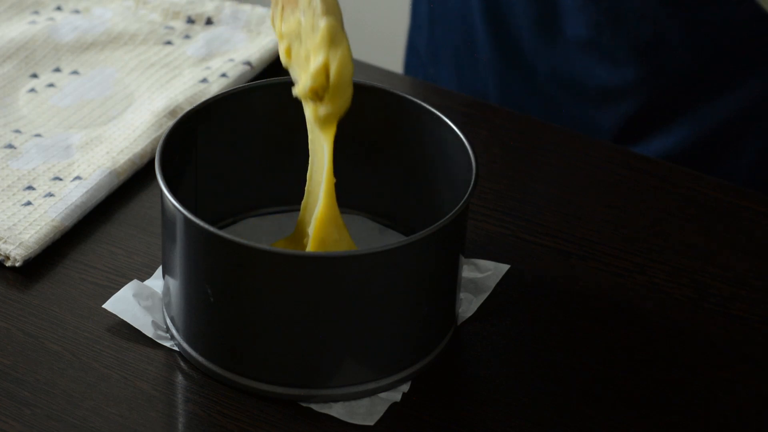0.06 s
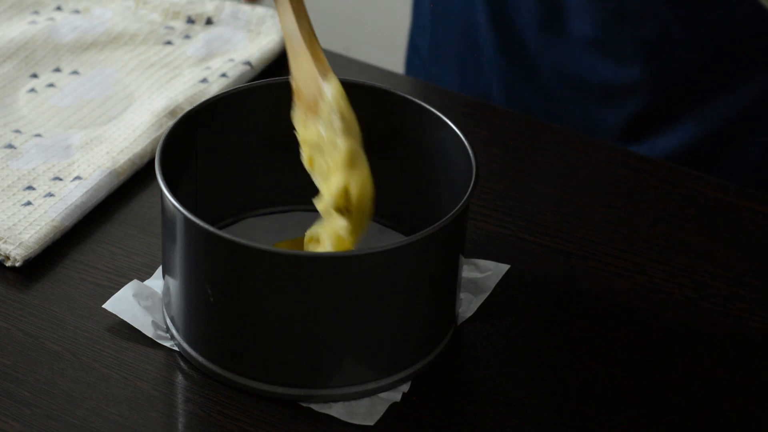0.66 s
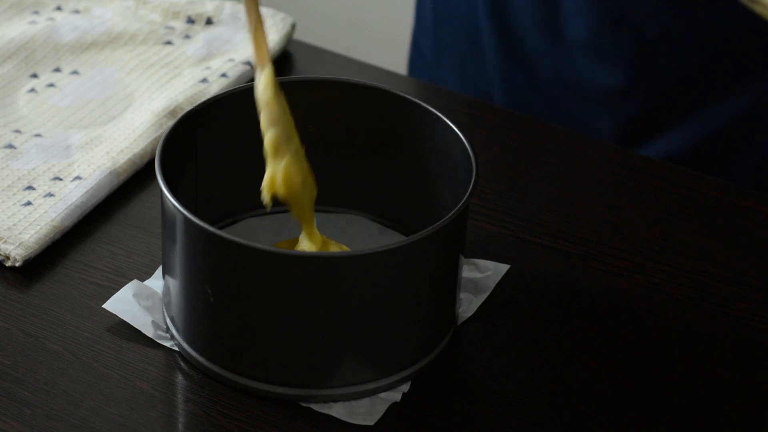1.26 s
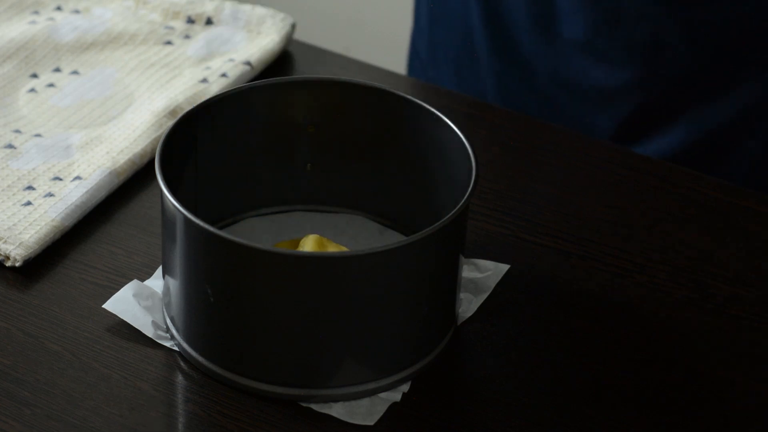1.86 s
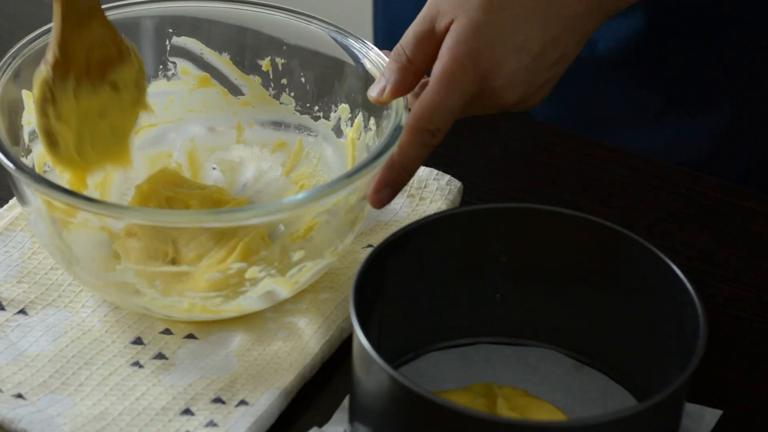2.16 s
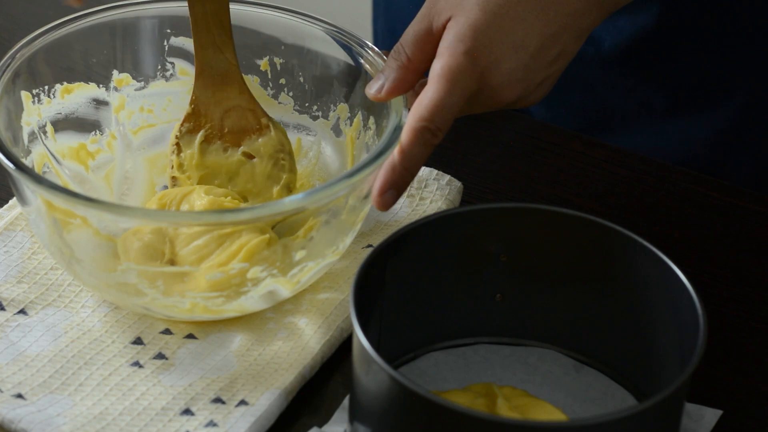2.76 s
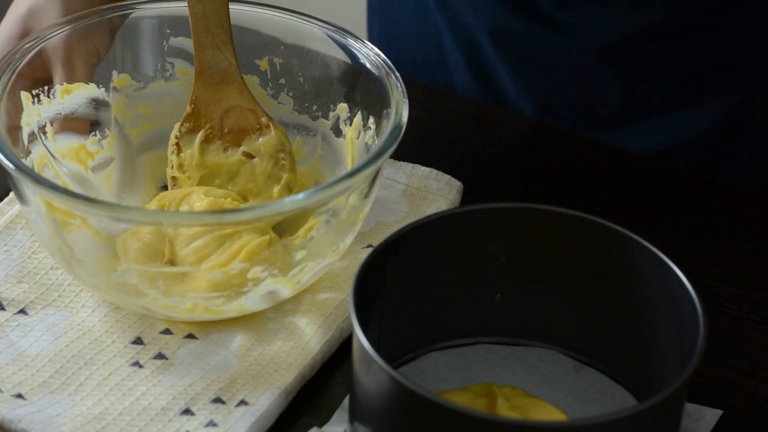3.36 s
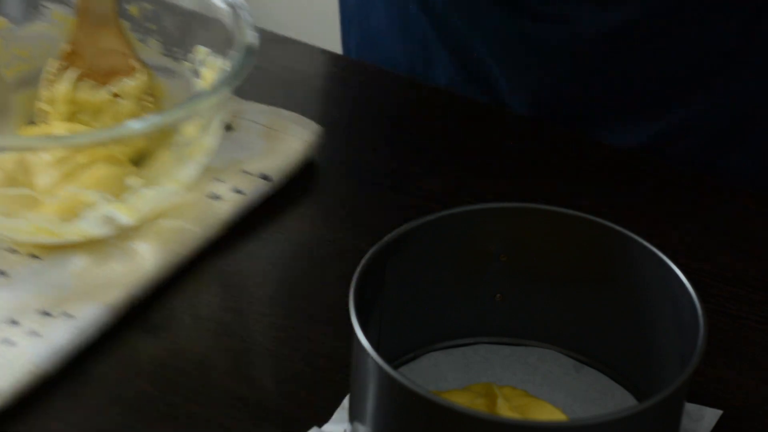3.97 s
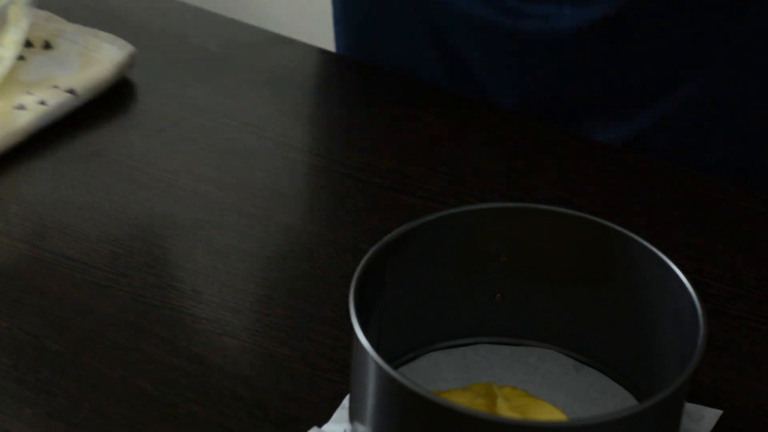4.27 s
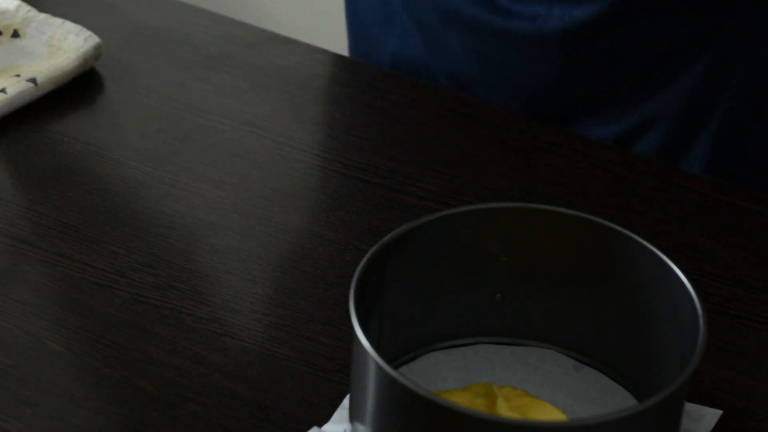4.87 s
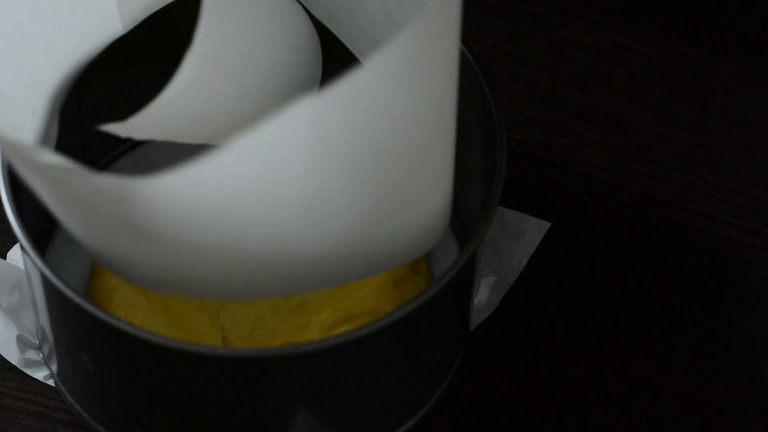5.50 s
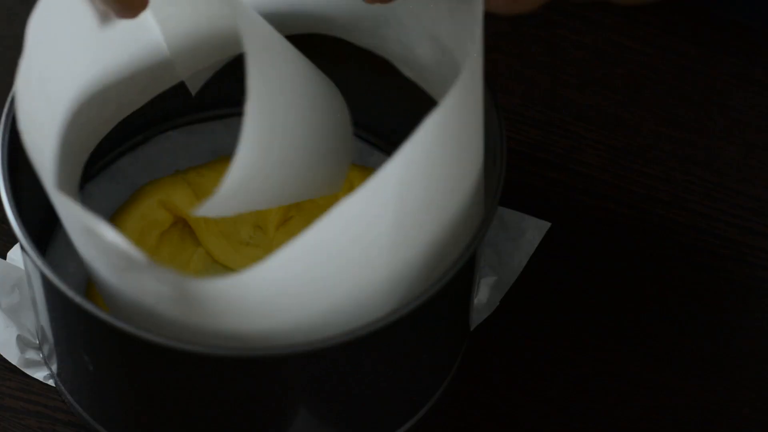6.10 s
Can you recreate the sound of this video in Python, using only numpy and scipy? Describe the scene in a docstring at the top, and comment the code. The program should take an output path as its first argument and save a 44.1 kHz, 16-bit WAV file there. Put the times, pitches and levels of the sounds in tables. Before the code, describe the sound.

In a small, slightly echoing kitchen, batter smears very faintly off a wooden spoon. The spoon clacks against a glass bowl, ticks, then clacks again with a quick rattle, the glass ringing briefly. The table takes a dull bump, the bowl slides away on a towel, and a lighter clink follows. Parchment paper then rustles, scrapes and snaps into a metal cake pan. Everything is heard from straight ahead over faint hiss.

```python
"""Baking at a kitchen table

Batter smears off a wooden spoon, the spoon clacks in a glass bowl and sets it ringing, the table is
bumped and the bowl is dragged away on its towel. Then a collar of parchment paper flexes, scrapes
and snaps as it is shoved into a metal cake pan. A small live room, with faint hum and hiss."""
import sys
import numpy as np
from scipy import signal
from scipy.fft import rfft, irfft, next_fast_len
from scipy.io import wavfile
from scipy.ndimage import map_coordinates

SR = 44100
rng = np.random.default_rng(int(sys.argv[2]) if len(sys.argv) > 2 else 0)


def file_out(sig):
    """Save sig as 16-bit WAV at sys.argv[1]."""
    # one column per channel
    cols = np.atleast_2d(sig).T
    # limit, then scale
    lim = np.clip(cols, -1, 1)
    pcm = np.round(lim * 32767).astype(np.int16)
    wavfile.write(sys.argv[1], SR, pcm)


N = 275184
TIME = np.arange(N) / SR
AGE = TIME[:SR * 3 // 4]  # seconds since a hit

# bending modes of the bowl's rim: f/Hz, relative level/dB, base t60/s
RIM_MODES = [(403, -7, .33), (1051, -5, .25), (1937, 2.5, .24), (3048, -2.5, .27), (4368, -8.5, .25),
             (5868, -25, .3), (7400, -25, .14)]
# tone of a paper crease giving way: f/Hz, level/dB
CREASE_SPECTRUM = [(41, -58), (70, -42), (272, -25), (613, -5), (822, -22.5), (1550, -8.5), (1770, -7),
                   (2030, -2.5), (2380, -8), (4090, -8), (4790, -13), (6570, -14.5), (15500, -19)]
# shoves of the paper into the pan: t/s, length/s, starting level/dB
PAPER_SHOVES = [(5.193, 0.21, -56.5), (5.444, 0.053, -52.5), (5.53, 0.02, -48), (5.748, 0.032, -58.5),
                (5.863, 0.084, -58.5), (6.049, 0.061, -53.5), (6.148, 0.041, -59), (6.206, 0.013, -42)]
# stereo image of the room: f/Hz, left-right likeness
ROOM_LIKENESS = [(100, 1), (1200, 0.99), (2500, 0.95), (5000, 0.8), (9000, 0.83), (15000, 0.56)]


def amp(db):
    """Decibels to gain."""
    return 10 ** (np.asarray(db) / 20)


def unit(x):
    """Scale to rms 1."""
    return x / np.sqrt(np.mean(x ** 2) + 1e-20)


def along(points, hz):
    """Read (frequency, value) points on a log axis."""
    f, v = np.transpose(points)
    return np.interp(np.log(hz + 1), np.log(f + 1), v)


def wobble(rate):
    """A smooth random curve, rate knots a second."""
    return map_coordinates(rng.standard_normal(int(N * rate / SR) + 4), [TIME * rate])


def swell(start_s, length_s, attack_s, fade_db_per_s, grow_db_per_s=0):
    """An envelope that rises, holds or grows until its length is up, then fades."""
    age = TIME - start_s
    db = grow_db_per_s * np.clip(age, 0, length_s) - fade_db_per_s * np.maximum(age - length_s, 0)
    return np.clip(age / attack_s, 0, 1) * amp(db)


def add(track, s, sound):
    """Mix a sound in at time s."""
    part = track[:, round(s * SR):][:, :sound.shape[-1]]
    part += sound[..., :part.shape[1]]


def filtered(x, response):
    """Equalise x with a gain given as a function of frequency."""
    n = x.shape[-1]
    padded = next_fast_len(n + 8192)
    return irfft(rfft(x, padded) * response(np.fft.rfftfreq(padded, 1 / SR)), padded)[..., :n]


def diffuse(n, likeness=ROOM_LIKENESS):
    """Stereo white noise, centred in the bass and wider in the treble."""
    def mid_side_gains(hz):
        width = np.arccos(np.clip(along(likeness, hz), 0, 1)) / 2
        return np.array([np.cos(width), np.sin(width)])
    mid, side = filtered(rng.standard_normal((2, n)), mid_side_gains)
    return np.array([mid + side, mid - side])


def rush(spectrum, likeness=ROOM_LIKENESS):
    """Steady stereo noise of rms 1 with the given colour."""
    return unit(filtered(diffuse(N, likeness), lambda hz: amp(along(spectrum, hz))))


def pulse(colour_db, spread=0.000409, size=4096):
    """A click with the energy of 10 ms at rms 1; bending waves carry its treble ahead of its bass."""
    hz = np.fft.rfftfreq(size, 1 / SR)
    cepstrum = irfft(np.log(amp(colour_db(hz)) + 1e-6))
    cepstrum[1:size // 2] *= 2  # minimum phase keeps the attack sharp
    cepstrum[size // 2 + 1:] = 0
    phase_lag = 4 * np.pi * spread * np.sqrt(1000 * hz)
    click = irfft(np.exp(rfft(cepstrum) - 1j * phase_lag))
    return unit(click) * np.sqrt(SR / 100 / size)


def ring(modes, rise_s, split, twin_db, twin_life):
    """Decaying modes, each beating against a weaker, slightly sharp twin."""
    hz, db, t60 = np.transpose(modes)[:, :, None]
    main = amp(-60 * AGE / t60) * np.sin(2 * np.pi * hz * AGE)
    twin = amp(twin_db - 60 * AGE / (t60 * twin_life)) * np.cos(2 * np.pi * hz * (1 + split) * AGE)
    gains = amp(db + rng.standard_normal(hz.shape))
    return (gains * (main + twin)).sum(0) * (1 - np.exp(-AGE / rise_s))


def in_kitchen(x, wet_db):
    """A short sound followed by its own dense tail of wall echoes."""
    # reverb time of the kitchen: f/Hz, t60/s
    reverb_times = [(150, 0.66), (500, 0.48), (1500, 0.29), (4000, 0.34), (12000, 0.31)]
    hz, t, noise = signal.stft(diffuse(len(AGE)), SR, nperseg=256)
    decay = amp(-60 * t / along(reverb_times, hz)[:, None])
    tail = signal.istft(noise * decay, SR, nperseg=256)[1][:, :len(AGE)]
    tail *= 1 - np.exp(-AGE / 0.00037)
    response = amp(wet_db) * tail / np.linalg.norm(tail[0])
    response[:, 0] += 1  # direct sound
    return signal.fftconvolve(x[None], response, axes=1)[:, :len(AGE)]


def hum():
    """A faint hum swells three times, wavering and sinking in pitch."""
    # swells of the hum: t/s, length/s, starting f/Hz, level/dB
    hum_swells = [(.9, 0.92, 542, -73), (3.25, 0.53, 560, -61.5), (4.77, 0.405, 557.5, -62)]
    sag_hz_per_s, waver_hz = 34, 8.93
    out = np.zeros(N)
    for s, length, hz, db in hum_swells:
        pitch_hz = hz - sag_hz_per_s * (TIME - s) + waver_hz * wobble(60)
        envelope = amp(db) * swell(s, length, attack_s=0.081, fade_db_per_s=150)
        out += envelope * np.sin(2 * np.pi * np.cumsum(pitch_hz) / SR)
    flutter = 1 + 0.3 * wobble(30)
    return flutter * out


def room_tone():
    """The bed: still air and microphone hiss, the hum, and a low drone that comes and goes once."""
    # tone of the air and hiss: f/Hz, level/dB
    air_spectrum = [(25, -46), (50, -26), (80, -16), (100, -12), (125, -0.5), (173, -7.5), (322, -3.5),
                    (520, -1), (700, -3), (1140, -3), (3300, -9.5), (15500, -15)]
    # their stereo image: f/Hz, left-right likeness
    air_likeness = [(60, 1), (150, 0.91), (380, 0.75), (950, 0.66), (2380, 0.025), (5980, 0.066),
                    (15000, 0.0)]
    drone_gain = amp(-76.5) * swell(start_s=0.92, length_s=0.72, attack_s=0.12, fade_db_per_s=110)
    drone_hz = 76 + 0.87 * wobble(9.1)
    drone = drone_gain * np.sin(2 * np.pi * np.cumsum(drone_hz) / SR)
    return amp(-57.5) * rush(air_spectrum, air_likeness) + hum() + drone


def batter():
    """One soft, sticky smear as the batter leaves the spoon."""
    smear_spectrum = [(200, -57), (600, 16), (2000, 19), (3500, -27), (12000, -26)]  # f/Hz, level/dB
    smear = swell(start_s=0.5, length_s=0.15, attack_s=0.11, fade_db_per_s=45)
    return smear * amp(-64 + 1.2 * wobble(40)) * rush(smear_spectrum)


def towel():
    """Cloth hisses over the wood grain in one pull: faster is louder, and its rasp rises in pitch."""
    # tone of the sliding cloth: f/Hz, level/dB
    cloth_spectrum = [(59, -52), (100, -25), (570, -11), (620, -17), (674, -5), (1090, -11), (1190, -18),
                      (1590, -3.5), (2370, -5.5), (15000, -27.5)]
    start_s, length_s, skew = 3.68, 0.81, 1.22
    progress = np.clip((TIME - start_s) / length_s, 0, 1)
    speed = 0.9 * np.sin(np.pi * progress ** skew)
    rasp_hz = 850 + 850 * speed
    roughness = unit(filtered(rng.standard_normal(N), lambda hz: 1 / (1 + (hz / 330) ** 2)))
    rasp = roughness * np.sin(2 * np.pi * np.cumsum(rasp_hz) / SR)
    hiss = amp(-53 + 0.45 * wobble(30.2)) * rush(cloth_spectrum)
    return speed * (hiss + amp(-49) * rasp)


def table_bump():
    """A dull, indirect knock with a short rattle; the table and pan hum on after it."""
    # the bump and its rattle: t/s, relative level/dB
    hits = [(3.2519, -40.5), (3.263, -40), (3.278, -42), (3.297, -42)]
    # tone of each hit: f/Hz, level/dB
    hit_spectrum = [(35, -73), (60, -37), (222, -5.5), (265, -6.5), (404, -9.5), (515, -9), (703, -5),
                    (768, -9), (1600, -6), (1780, -7.5), (12000, -37.5), (15600, -62), (22000, -120)]
    # ring of the table and pan: f/Hz, level/dB, t60/s
    table_modes = [(145, -47.5, 0.55), (227.5, -48, 0.41), (716, -38, 0.61)]
    out = np.zeros((2, N))
    for s, db in hits:
        knock = pulse(lambda hz: along(hit_spectrum, hz))
        add(out, s, amp(db - 10) * in_kitchen(knock, wet_db=12))
    add(out, hits[1][0], ring(table_modes, rise_s=0.055, split=0.0059, twin_db=-10, twin_life=1))
    return out


def shoving(fade_db_per_s):
    """The strongest shove at each moment: the paper catches, then the pressure builds."""
    shoves = [amp(db) * swell(s, length, attack_s=0.014, fade_db_per_s=fade_db_per_s, grow_db_per_s=38)
              for s, length, db in PAPER_SHOVES]
    return np.max(shoves, axis=0)


def crackle(per_s, spread_db, t60_s=0.0063):
    """Tiny creases give way at random, each a short burst of noise; rms 1 overall."""
    sizes = amp(spread_db * np.clip(rng.standard_normal(N), -2, 2))
    pops = (rng.random(N) < per_s / SR) * sizes
    power = signal.fftconvolve(pops ** 2, amp(-60 * AGE / t60_s) ** 2)[:N]
    return unit(np.sqrt(np.abs(power)) * rush(CREASE_SPECTRUM))


def parchment():
    """With each shove the sheet flexes and its edge slips along the pan; creases pop on top."""
    # body of the flexing sheet: f/Hz, level/dB
    sheet_spectrum = [(47, -56), (80, -32), (92, -33), (107, -2.5), (145, -29), (241, -12), (322, -7),
                      (445, -13.5), (584, 4), (712, -8), (1080, -2), (1520, -5), (1820, -7.5), (6000, -16),
                      (7800, -44), (13200, -120)]
    # bright scrape of its edge: f/Hz, level/dB
    edge_spectrum = [(1500, -22), (4000, -1), (9000, 2.5), (15500, -4.5)]
    # the loudest creases popping: t/s, relative level/dB, relative treble/dB
    snaps = [(5.1905, -36.5, -4), (5.2759, -36, -17), (5.3671, -30, -21), (5.485, -35, -15),
             (5.5518, -37, -10), (5.5759, -34, -44), (5.803, -39.5, -26), (5.899, -37, -14),
             (5.9848, -40, 2), (6.0897, -32.5, -25), (6.1698, -36.5, -40), (6.2169, -18, -15.5)]
    held = amp(-58) * (TIME > PAPER_SHOVES[0][0])  # the bent sheet keeps rustling between shoves
    flexing = np.hypot(held, amp(-2.5) * shoving(fade_db_per_s=110))
    sliding = amp(-2.5) * shoving(fade_db_per_s=194)  # the edge stops before the sheet settles
    slips = wobble(260)
    rustle = flexing * amp(1.9 * slips + 0.63 * wobble(45)) * rush(sheet_spectrum)
    scrape = sliding * amp(2.0 * slips + 1.6 * wobble(1500)) * rush(edge_spectrum)
    creases = (amp(-12.5) * flexing + amp(-10.5) * sliding) * crackle(per_s=220, spread_db=5)
    out = rustle + scrape + creases
    for s, db, treble_db in snaps:
        shelf_db = lambda hz: (treble_db + 13.5) / (1 + (5000 / (hz + 1)) ** 4)
        snap = pulse(lambda hz: along(CREASE_SPECTRUM, hz) + shelf_db(hz))
        add(out, s, amp(db - 17) * in_kitchen(snap, wet_db=4.5))
    return out


def rim_db(hz, lift_db, width=0.017):
    """The bowl radiates a clack most strongly around its own modes."""
    return sum(lift_db / (1 + ((hz / mode_hz - 1) / width) ** 2) for mode_hz, _, _ in RIM_MODES)


def spoon_knocks():
    """Each blow is a wooden clack plus the ring of the glass, which the pressed spoon damps quickly."""
    # spoon on bowl: t/s, clack level/dB, contact corner f/Hz, thud lift/dB, glass level/dB,
    # ring length factor (small while the spoon stays pressed), rim lift/dB
    knocks = [(2.1917, -23, 3200, -10.5, -20, 0.78, 8.5), (2.519, -48.5, 1100, 5.5, -60, 1, 7),
              (2.6975, -19.5, 4140, -3.5, -24, 1.17, 9.5), (2.727, -28, 4420, -7.5, -33, 1.34, 7),
              (2.7576, -48, 1810, 8, -28, 0.45, 2), (2.778, -63, 1790, -6.5, -18.5, 0.7, 6),
              (4.543, -34, 2210, -4.5, -30, 1, 13.5)]
    # tone of the wooden clack: f/Hz, level/dB
    wood_spectrum = [(60, -41), (200, -32), (390, -5), (730, -1.5), (880, -12), (1200, 3), (1450, 0),
                     (2030, -9.5), (2300, -3.5), (2700, -12), (3600, -12.5), (5200, -21), (7500, -21.5),
                     (12000, -24.5)]
    # short resonances of the spoon pressed on the bowl: f/Hz, relative level/dB, t60/s
    spoon_modes = [(372, -15, .35), (548, -11, .3), (614, -8, .3), (716, -5, .27), (765, -12, .25),
                   (1152, -6, .22), (1186, -1, .2), (1265, -4, .13), (1356, 0, .2), (1457, -5, .18),
                   (1490, -6, .18), (1525, -4, .2), (1659, -7, .17), (1763, -5, .12), (2183, -10, .2),
                   (2341, -8, .18), (4310, -6, .16)]
    out = np.zeros((2, N))
    for s, db, corner_hz, thud_db, glass_db, ring_factor, rim_lift_db in knocks:
        # a softer contact lasts longer and loses treble; a heavier one pushes the whole bowl
        contact_db = lambda hz: thud_db / (1 + (hz / 850) ** 6) - 10 * np.log10(1 + (hz / corner_hz) ** 4)
        clack_db = lambda hz: along(wood_spectrum, hz) + rim_db(hz, rim_lift_db) + contact_db(hz)
        clack = in_kitchen(pulse(clack_db, spread=0.001304), wet_db=2.5)
        wood_modes = [(hz, level + contact_db(hz), t60) for hz, level, t60 in spoon_modes]
        wood = ring(wood_modes, rise_s=0.0071, split=0.0089, twin_db=-4, twin_life=0.63)
        glass_modes = [(hz, level + 1.44 * contact_db(hz), t60 * ring_factor)
                       for hz, level, t60 in RIM_MODES]
        glass = ring(glass_modes, rise_s=0.0063, split=0.00572, twin_db=-15, twin_life=2.01)
        add(out, s, amp(db) * (clack + amp(-2.5) * wood) + amp(glass_db) * glass)
    return out


def handle_ticks():
    """The spoon's handle gives a few sharp little ticks."""
    # ticks of the handle: t/s, relative level/dB
    ticks = [(2.2851, -38.5), (2.2926, -42), (2.308, -51)]
    # tone of a tick: f/Hz, level/dB
    tick_spectrum = [(180, -41), (300, -17), (1220, -20), (1540, -7.5), (1940, -1), (2790, -8),
                     (3070, -9.5), (15500, -37)]
    tick = pulse(lambda hz: along(tick_spectrum, hz), spread=0.00021)
    out = np.zeros((2, N))
    for s, db in ticks:
        add(out, s, amp(db + 2.5) * in_kitchen(tick, wet_db=-1.5))
    return out


def scene():
    """Everything at the table, heard from straight ahead."""
    return spoon_knocks() + handle_ticks() + table_bump() + towel() + batter() + parchment() + room_tone()


def record(dry):
    """A brick-wall low-pass takes off the very top."""
    return filtered(dry, lambda hz: hz < 15850)


dry = scene()
out = record(dry)
file_out(out)
```